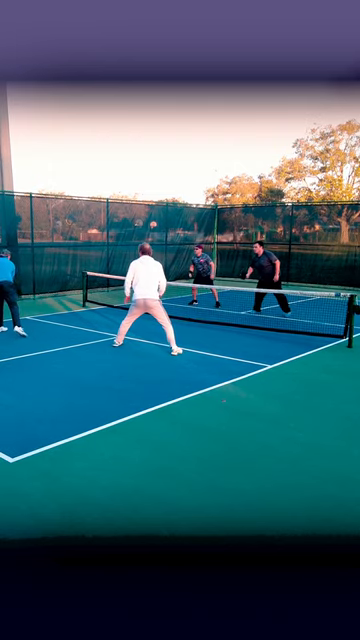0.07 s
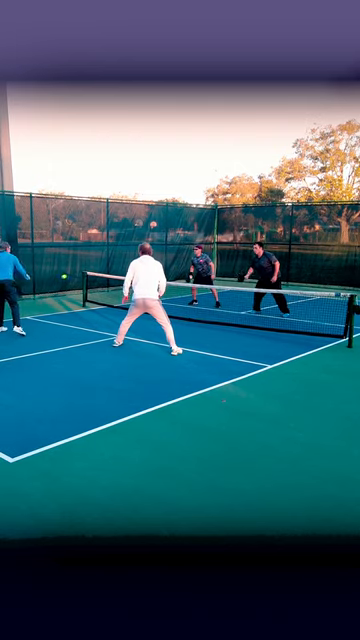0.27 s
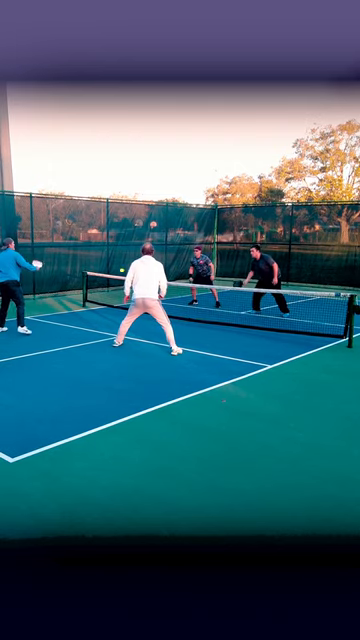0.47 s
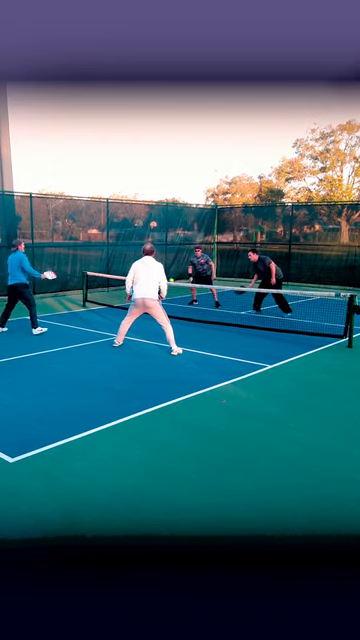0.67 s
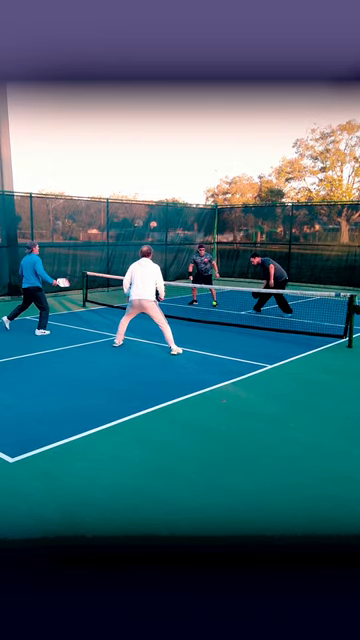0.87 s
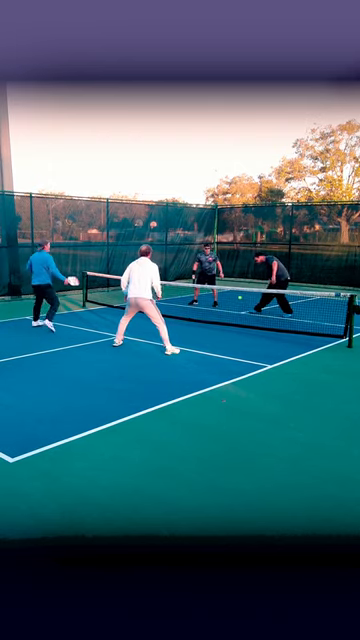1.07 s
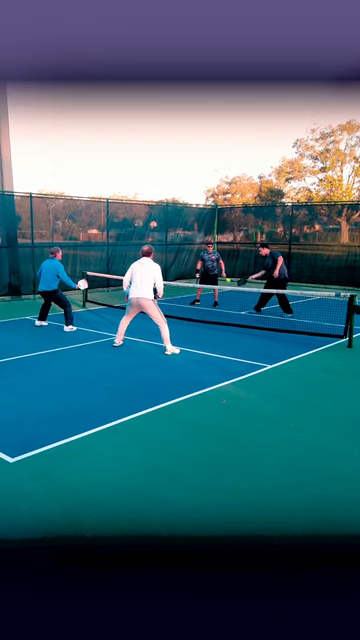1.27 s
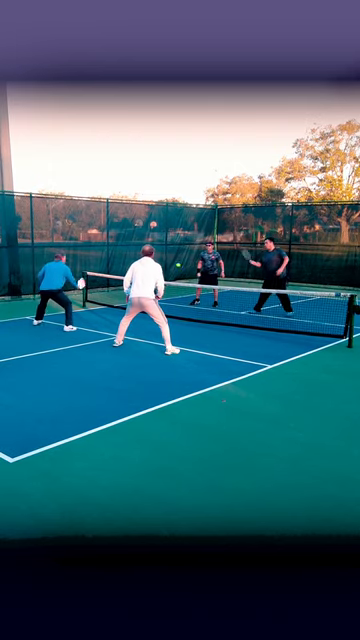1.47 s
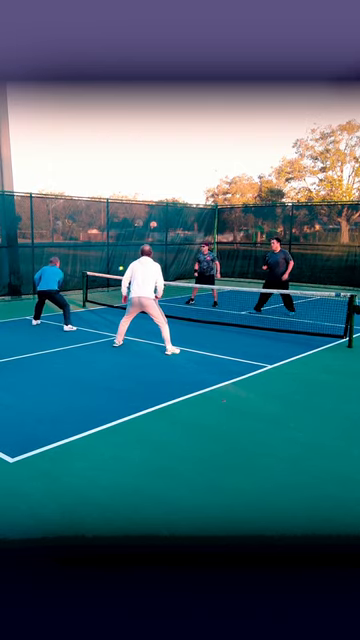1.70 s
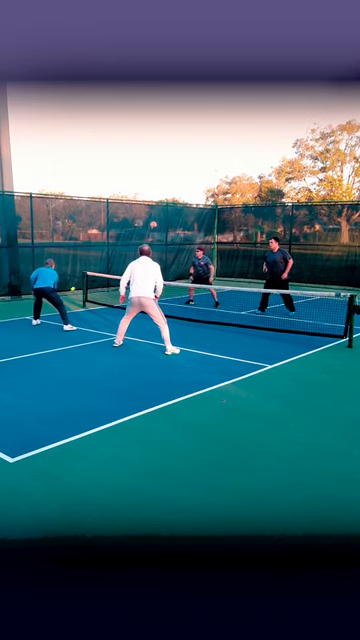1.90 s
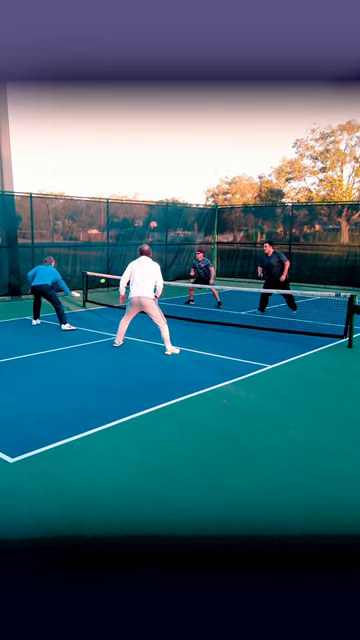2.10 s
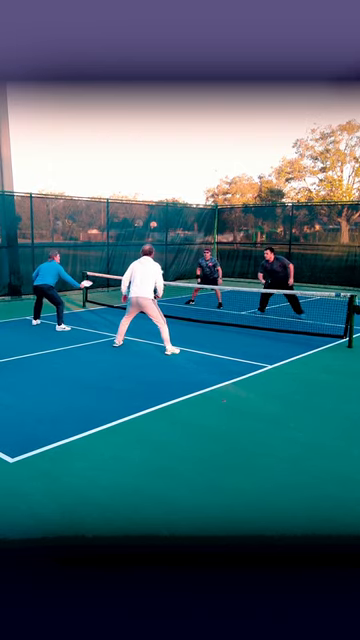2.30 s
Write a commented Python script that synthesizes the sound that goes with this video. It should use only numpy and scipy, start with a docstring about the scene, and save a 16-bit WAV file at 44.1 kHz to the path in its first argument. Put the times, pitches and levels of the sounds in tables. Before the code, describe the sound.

Pickleball paddles pop a hollow plastic ball three times, with faint bounces and shoe scuffs.

```python
"""A distant rumble and a low hum, then the pop of a paddle: a soft pickleball rally on an outdoor
hard court. Each stroke rings the paddle and cracks against the hollow plastic ball, which bounces
between the two players. Shoes tap and scuff on the gritty surface. Fences and walls return faint
echoes, and the mesh scatters the treble into hiss."""
import sys
import numpy as np
from scipy import signal
from scipy.fft import rfft, irfft
from scipy.io import wavfile
from scipy.ndimage import uniform_filter1d

SR = 44100
rng = np.random.default_rng(int(sys.argv[2]) if len(sys.argv) > 2 else 0)


def master(y):
    """Save y as 16-bit WAV."""
    cut = np.clip(np.atleast_2d(y).T, -1, 1)
    pcm = np.round(cut * 32767)  # scale
    wavfile.write(sys.argv[1], SR, pcm.astype(np.int16))


N = 108045


def undb(db):
    return 10 ** (np.asarray(db) / 20)


def bin_hz(size):
    return np.maximum(np.fft.rfftfreq(size, 1 / SR), 1)


def eq_curve(points, size):
    """Gain per FFT bin through (frequency [Hz], level [dB]) points."""
    hz, db = np.array(points).T
    return undb(np.interp(np.log(bin_hz(size)), np.log(hz), db))


def coloured(points, size):
    """Unit noise shaped by an EQ curve."""
    noise = irfft(rfft(rng.standard_normal(size)) * eq_curve(points, size), size)
    return noise / noise.std()


def band(hz, octaves, size):
    """Unit noise in a bell-shaped band."""
    distance = np.log2(bin_hz(size) / hz) / octaves
    noise = irfft(rfft(rng.standard_normal(size)) / (1 + distance ** 2 / 10) ** 10, size)
    return noise / noise.std()


def click(points, size):
    """A minimum-phase click of unit energy, shaped by an EQ curve."""
    cepstrum = irfft(np.log(eq_curve(points, size)))
    pulse = irfft(np.exp(rfft(2 * cepstrum[:size // 2], size)))
    return pulse / np.linalg.norm(pulse)


def fade(t, t60):
    """Exponential decay, 60 dB down after t60."""
    return np.exp(-np.log(1000) * t / t60)


def wander(rate_hz):
    """Smooth random modulation of unit spread."""
    hold = int(SR / rate_hz)
    stairs = np.repeat(rng.standard_normal(N // hold + 4), hold)
    smooth = uniform_filter1d(uniform_filter1d(stairs, hold), hold)[hold:hold + N]
    return smooth / smooth.std()


def lowpass(x, hz, order):
    return signal.sosfilt(signal.butter(order, hz, fs=SR, output="sos"), x)


def add(out, start, sound):
    """Mix a sound in at start [s]."""
    i = max(int(start * SR), 0)
    out[i:i + len(sound)] += sound[:max(N - i, 0)]


# Tone of the distant rumble (frequency [Hz], relative level [dB])
RUMBLE_EQ = [(20, -16), (45, -12), (75, -10.5), (100, -18), (150, -20), (210, -23.5), (300, -32),
             (600, -34.5), (1000, -37.5), (1450, -41.5), (2050, -47.5), (2900, -53), (4000, -61),
             (7000, -65.5), (16000, -73)]


def background(rumble_db=-49.5, hum_db=-50, hum_hz=60):
    """A steady bed of distant rumble, with a hum that wavers in pitch and level."""
    phase = 2 * np.pi * np.cumsum(hum_hz + .5 * wander(5.8)) / SR
    hum = np.sqrt(2) * np.sin(phase) * undb(hum_db + 1.8 * wander(6.43))
    return hum + coloured(RUMBLE_EQ, N) * undb(rumble_db)


def impacts(hits, modes, crack_eq):
    """A brief push rings a body's modes, duller the longer it lasts; the surfaces crack as they meet."""
    out, t = np.zeros(N), np.arange(int(.12 * SR)) / SR
    pivot_hz, crack_size = modes[1][0], 2048
    for start, db, contact_ms, crack_db, cutoff_hz, tilt_db in hits:
        push = np.sin(np.pi * np.minimum(t * 1000 / contact_ms, 1)) ** 2
        ring = np.zeros(len(t))
        for hz, mode_db, t60 in modes:
            gain = undb(mode_db + tilt_db * np.log2(hz / pivot_hz))
            ring += gain * np.cos(2 * np.pi * hz * t) * fade(t, t60)
        add(out, start, undb(db) * signal.fftconvolve(ring, push / push.sum())[:len(t)])
        fizz = undb(-17) * coloured(crack_eq, crack_size) * fade(t[:crack_size], t60=.018)
        crack = lowpass(click(crack_eq, crack_size) + fizz, cutoff_hz, order=2)
        add(out, start + contact_ms / 4000, undb(db + crack_db) * crack)  # a quarter into the contact
    return out


# Near strokes (time [s], level [dB], contact [ms], crack offset [dB], crack cutoff [Hz],
# mode tilt [dB/octave])
NEAR_STROKES = [(0.1545, -5.5, 0.55, -15.5, 15300, 3), (2.0093, -7, 0.44, 0.5, 14700, 0.5)]
# Ring of the near paddle (frequency [Hz], level [dB], t60 [s])
NEAR_MODES = [(389, -4.5, 0.0075), (772, -2.5, 0.026), (1365, -5, 0.026), (2020, -11, 0.0065),
              (2710, -15, 0.0077)]
# Tone of its crack (frequency [Hz], level [dB])
NEAR_CRACK_EQ = [(1000, 4.5), (2600, 16.5), (3900, -16.5), (5500, 4.5), (9500, -1), (16000, 0.5)]


def near_paddle(notch_hz=1105):
    """A close, hollow pop: the paddle's two main modes cancel between their peaks."""
    pops = impacts(NEAR_STROKES, NEAR_MODES, NEAR_CRACK_EQ)
    return signal.lfilter(*signal.iirnotch(notch_hz, Q=9.8, fs=SR), pops)


# Tone of the court's diffuse tail (frequency [Hz], level [dB])
TAIL_EQ = [(100, 5), (400, 3.5), (800, -3.5), (1400, 0), (3000, 1)]
# Treble scattered by the mesh fence (band centre [Hz], level [dB])
MESH_BANDS = [(3500, 4.5), (5000, 3.5), (7100, -5.5), (10000, 1.5), (14000, 1)]


def court_reverb(x, early_boost_db=0, late_boost_db=0, build_s=.012):
    """The direct sound plus a thin tail, whose treble the mesh fence scatters into hiss."""
    t, tail_power = np.arange(SR) / SR, 0
    for db, t60 in ((-18 + early_boost_db, .089), (-30.5 + late_boost_db, .98)):
        shape = (fade(t, t60) * np.minimum(t / build_s, 1) ** 2) ** 2
        tail_power += undb(db) ** 2 * shape / shape.sum()
    tail = coloured(TAIL_EQ, SR) * np.sqrt(tail_power)
    out = x + signal.fftconvolve(lowpass(x, hz=3000, order=6), tail)[:N]
    grains = np.exp(.25 * wander(400) - .25 ** 2)
    for hz, db in MESH_BANDS:
        half_octave = signal.butter(3, [hz / 2 ** .25, hz * 2 ** .25], "band", fs=SR, output="sos")
        energy = signal.fftconvolve(signal.sosfilt(half_octave, x) ** 2, tail_power)[:N]
        hiss = signal.sosfilt(half_octave, rng.standard_normal(N))
        out += undb(db) * np.sqrt(np.abs(energy)) * grains * hiss / hiss.std()
    return out


# Slapbacks off the fences (delay [s], level [dB], low cut [Hz], high cut [Hz], smear t60 [s])
FENCE_SLAPS = [(.0145, -17.5, 150, 477, .004), (.0155, -20, 3000, 12000, .005),
               (.032, -31.5, 700, 2000, .035), (0.042, -26, 3960, 14000, 0.0045),
               (.05, -32, 600, 6050, 0.049)]


def fence_echoes(x):
    """The fences throw back band-limited, slightly smeared slaps."""
    out, t = np.zeros(N), np.arange(1024) / SR
    for delay, db, low_hz, high_hz, smear_t60 in FENCE_SLAPS:
        smear = rng.standard_normal(len(t)) * fade(t, smear_t60)
        slap = signal.sosfilt(signal.butter(2, [low_hz, high_hz], "band", fs=SR, output="sos"), x)
        smeared = signal.fftconvolve(slap, smear)[:N]
        add(out, delay, undb(db) * smeared * slap.std() / smeared.std())
    return out


def wall_echo(x, delay_s=.0885, db=-30, centre_hz=1500):
    """A far wall returns one thin midrange slap."""
    out = np.zeros(N)
    add(out, delay_s, undb(db) * signal.lfilter(*signal.iirpeak(centre_hz, Q=2, fs=SR), x))
    return out


# Shoe slides (time [s], rise [s], fall [s], level [dB], hiss centre [Hz], spread [octaves])
SLIDES = [(0.261, 0.0056, 0.027, -75, 5970, 0.39), (0.736, 0.028, 0.11, -59.5, 5740, 0.45),
          (0.785, 0.038, 0.025, -64, 4500, 0.5), (0.903, 0.04, 0.19, -73.5, 7600, 0.71),
          (1.021, 0.029, .06, -73.5, 4580, 0.51), (1.341, 0.022, 0.011, -68, 5000, 1.8),
          (1.42, 0.032, 0.051, -76, 6560, 0.51), (1.46, 0.026, 0.056, -69, 4960, 0.31),
          (1.594, 0.015, 0.029, -63, 6770, 0.53), (1.66, 0.055, 0.25, -79.5, 4700, 0.25),
          (1.825, 0.04, 0.1, -65.5, 5630, 0.74), (1.964, .016, 0.15, -67.5, 4300, 0.68),
          (2.125, 0.036, 0.21, -63, 6600, 1.1), (2.27, 0.027, 0.19, -71.5, 6700, 1.1)]
# Tone of the rub under each slide (frequency [Hz], level [dB])
RUB_EQ = [(100, -14), (500, -2.5), (1200, -2.5), (2500, -4), (4000, -10), (8000, -17), (16000, -37)]


def shoe_scuffs(roughness=.2, rub_db=4.5):
    """Rubber drags over grit: a grainy hiss that swells and dies, with a duller rub below."""
    out, t = np.zeros(N), np.arange(N) / SR
    for start, rise, fall, db, hz, octaves in SLIDES:
        swell = np.interp(t, [start, start + rise, start + rise + fall], [0, 1, 0]) ** 1.37
        grains = np.exp(roughness * wander(1500) - roughness ** 2)
        friction = band(hz, octaves, N) + undb(rub_db) * coloured(RUB_EQ, N)
        out += undb(db) * swell * grains * friction
    return out


# Ball landings (time [s], level [dB], contact [ms], crack offset [dB], crack cutoff [Hz],
# mode tilt [dB/octave])
BALL_LANDINGS = [(0.7341, -22.5, 0.46, -6.5, 5550, -4), (1.1482, -31.5, 0.32, -27, 4000, -7.5)]
# Ring of the ball (frequency [Hz], level [dB], t60 [s])
BALL_MODES = [(484, -8, 0.0061), (1188, -5.5, 0.032), (1297, -4, 0.026), (2230, -5.5, 0.0074),
              (2710, -9, 0.018)]
# Tone of the gritty crack under ball or sole (frequency [Hz], level [dB])
GRIT_CRACK_EQ = [(1000, -13), (2800, 5), (4500, -8.5), (7300, 1.5), (9000, -8), (13000, -2), (16000, -20)]


def ball_bounces():
    """The hollow plastic shell rings as it knocks on the court."""
    return impacts(BALL_LANDINGS, BALL_MODES, GRIT_CRACK_EQ)


# Footfalls (time [s], level [dB], contact [ms], crack offset [dB], crack cutoff [Hz],
# mode tilt [dB/octave])
FOOTFALLS = [(0.796, -38.5, 0.58, -23, 3000, -7), (0.9755, -27, 0.5, 9, 13300, 2),
             (1.1452, -26, 1.15, 1, 4540, -9.5), (1.2225, -26.5, 0.76, -1, 6060, 5),
             (1.7225, -44.5, 0.47, -28, 3000, -4), (1.9375, -41.5, 0.88, -28, 2980, 6),
             (2.1093, -19.5, 0.56, -4.5, 4470, 1.5), (2.1203, -50.5, .25, -17, 3000, 7),
             (2.125, -34.5, 1.12, -28, 3000, -2), (2.161, -37, .8, -28, 3000, -5)]
# Ring of a sole (frequency [Hz], level [dB], t60 [s])
SOLE_MODES = [(134, -23, 0.042), (350, -1.5, 0.0071), (574, -13, 0.0086), (870, -20, 0.023),
              (1233, -14.5, 0.027), (2260, -11.5, 0.019)]


def footsteps():
    """Soles land on the hard court with a short, gritty tap."""
    return impacts(FOOTFALLS, SOLE_MODES, GRIT_CRACK_EQ)


# Snaps of grit (time [s], level [dB], band centre [Hz])
GRIT_SNAPS = [(0.9773, -36.5, 7550), (0.9829, -42.5, 7550), (1.15, -46, 2800), (1.157, -50, 3000),
              (1.3627, -76, 6000), (1.6, -58, 8760), (2.0287, -47, 8900)]


def grit_ticks():
    """Grit snaps under a sole in tiny, bright bursts."""
    out, t = np.zeros(N), np.arange(2048) / SR
    for start, db, hz in GRIT_SNAPS:
        add(out, start, undb(db) * band(hz, octaves=.8, size=len(t)) * fade(t, t60=.0075))
    return out


# Far stroke (time [s], level [dB], contact [ms], crack offset [dB], crack cutoff [Hz],
# mode tilt [dB/octave])
FAR_STROKES = [(1.2282, -4, 0.58, -1.2, 14000, 0)]
# Ring of the far paddle (frequency [Hz], level [dB], t60 [s])
FAR_MODES = [(205, -22, 0.04), (495, -4.5, 0.012), (700, -7.5, 0.01), (910, -17.5, 0.019),
             (1582, -9.5, 0.023), (2376, 4, 0.0043), (2900, -11.5, 0.045), (5450, -19, 0.0069)]
# Tone of its crack (frequency [Hz], level [dB])
FAR_CRACK_EQ = [(1000, -15), (2600, -9.5), (4300, -7.5), (5300, 4), (6800, -4.5), (8500, -14.5),
                (13000, -9), (16000, 1.5)]


def far_paddle():
    """The return shot: the ball rings the far paddle with a sharp pop."""
    return impacts(FAR_STROKES, FAR_MODES, FAR_CRACK_EQ)


def scene():
    """Paddles, ball and shoes share the court's reverb over the background bed, in mono."""
    near = near_paddle()
    paddles = near + far_paddle()
    ball = court_reverb(ball_bounces(), early_boost_db=-8, late_boost_db=20.5)
    shoes = footsteps() + grit_ticks() + shoe_scuffs()
    feet = court_reverb(shoes, early_boost_db=-.5, late_boost_db=-.5)
    strokes = court_reverb(paddles) + fence_echoes(paddles) + wall_echo(near)
    return (strokes + ball + feet + background())[None]


def record(dry, top_hz=16300):
    """A steep high cut takes the very top off the mix."""
    return signal.sosfilt(signal.ellip(8, .2, 70, top_hz, fs=SR, output="sos"), dry)


dry = scene()
out = record(dry)
master(out)
```